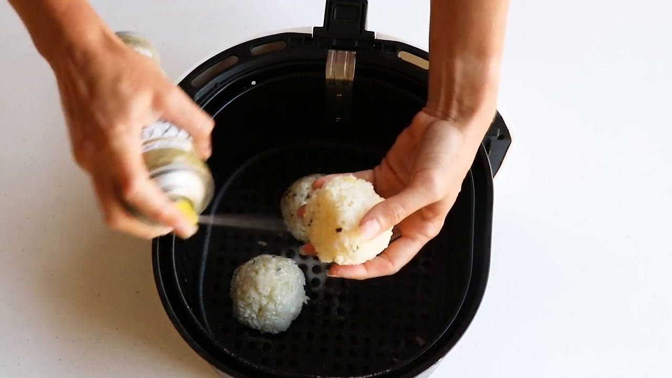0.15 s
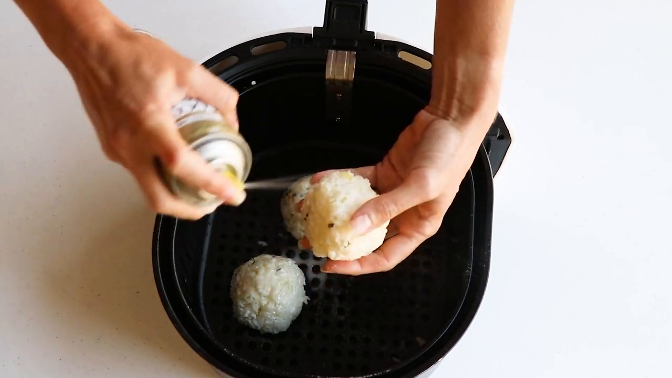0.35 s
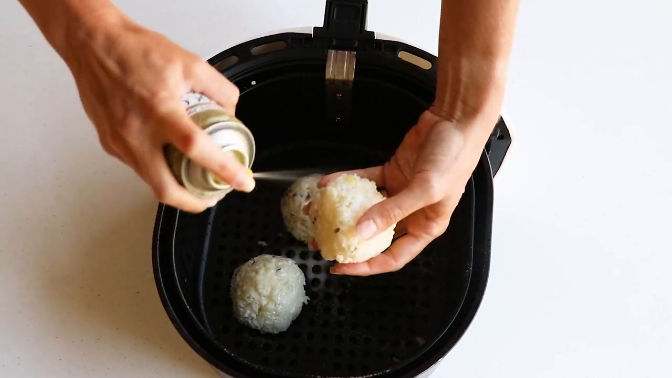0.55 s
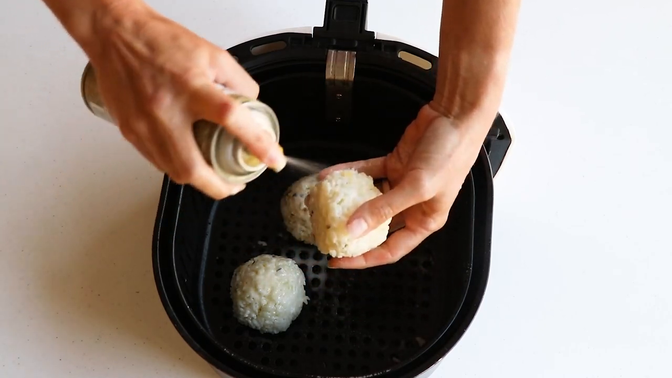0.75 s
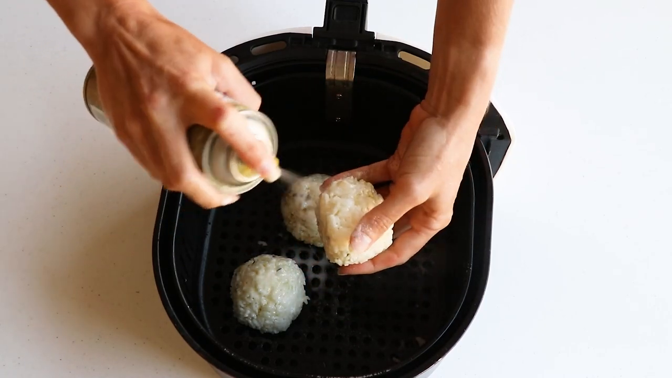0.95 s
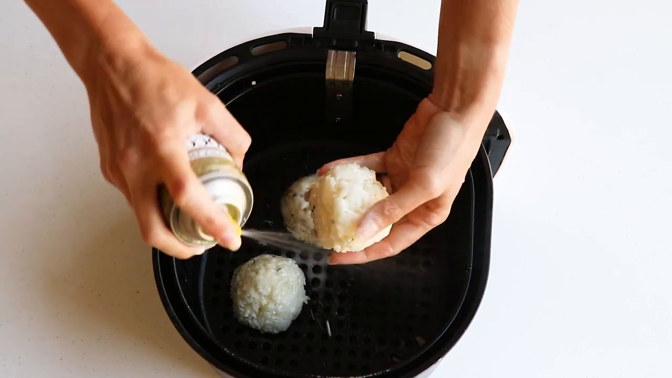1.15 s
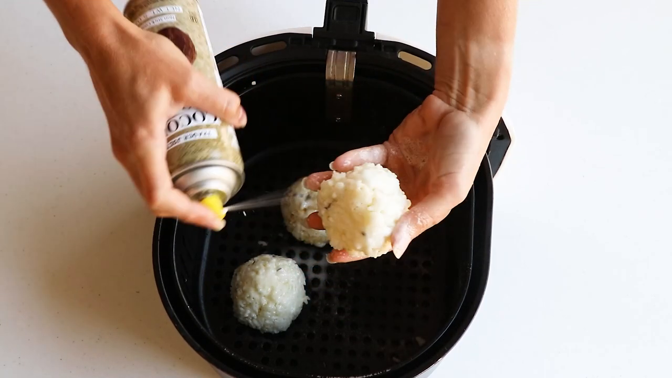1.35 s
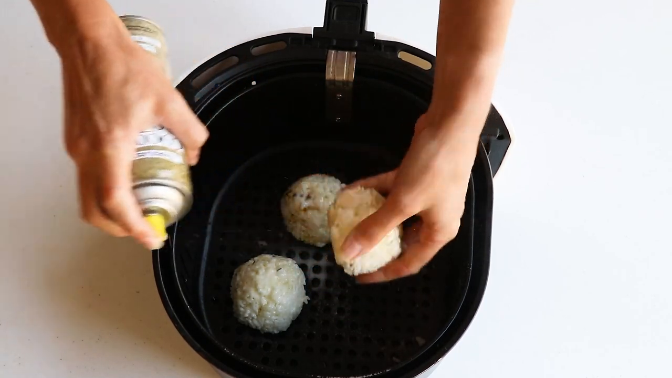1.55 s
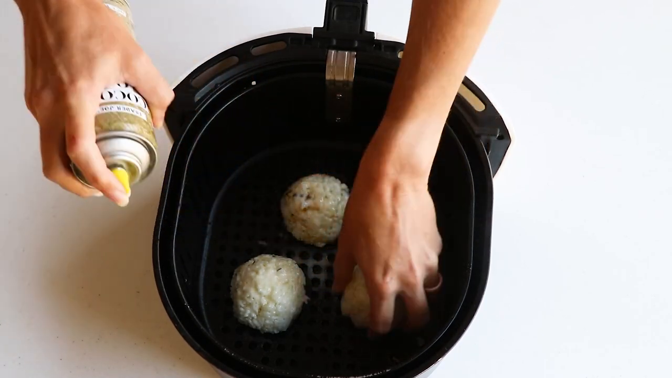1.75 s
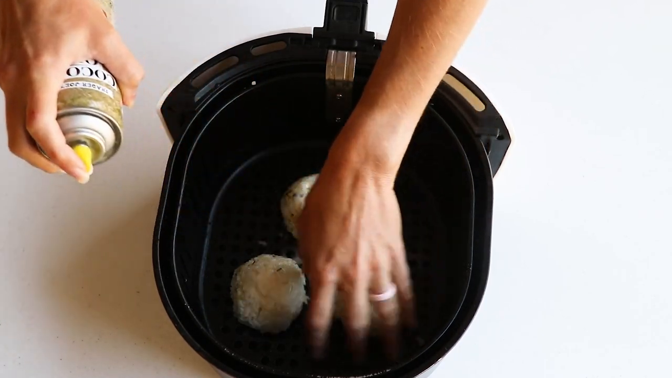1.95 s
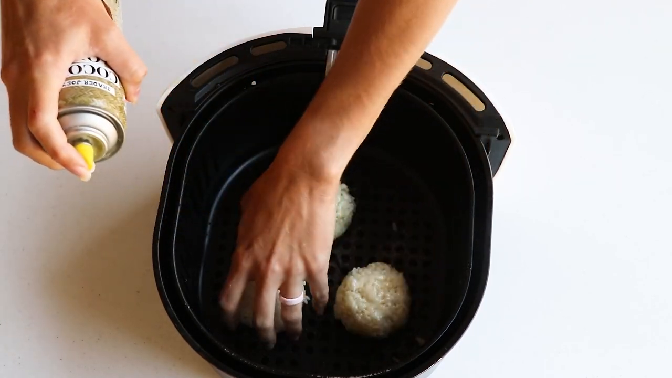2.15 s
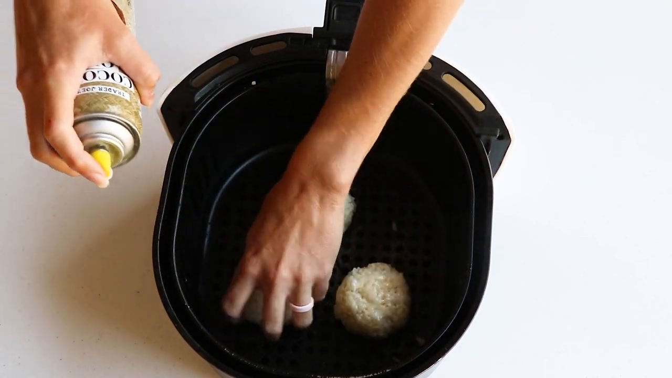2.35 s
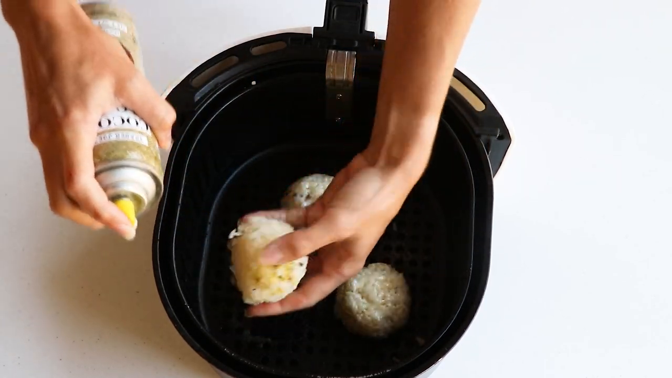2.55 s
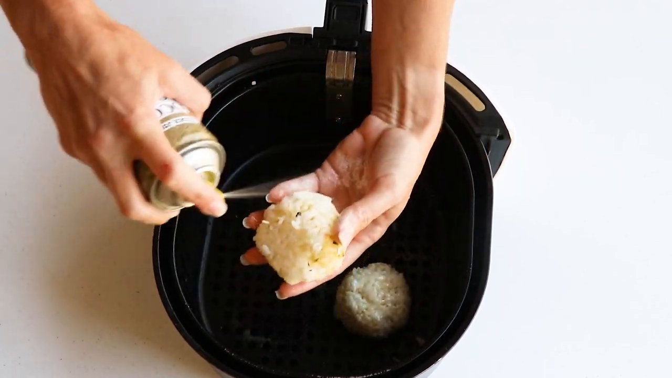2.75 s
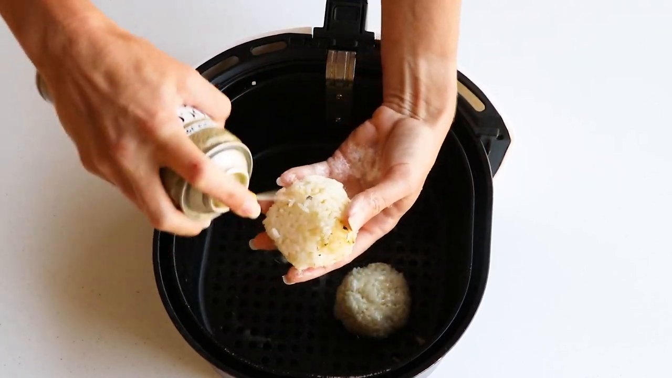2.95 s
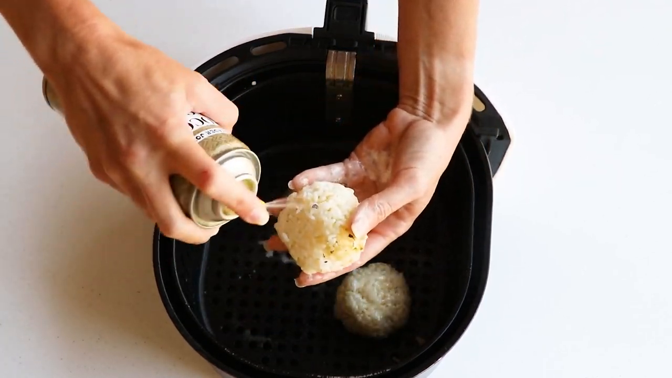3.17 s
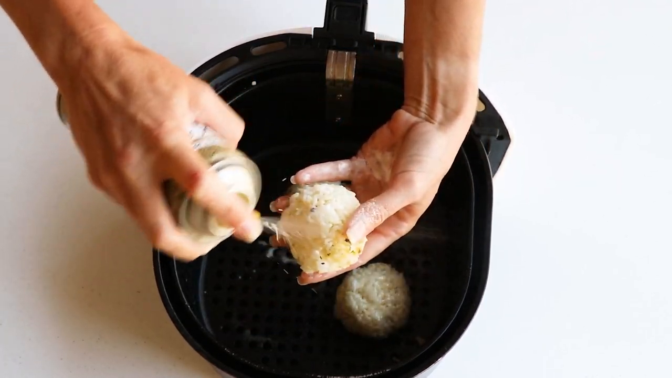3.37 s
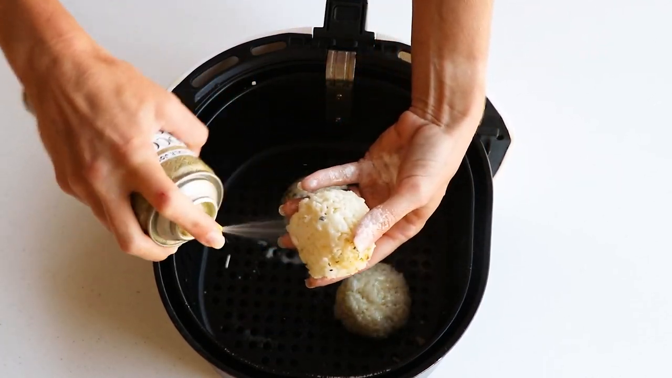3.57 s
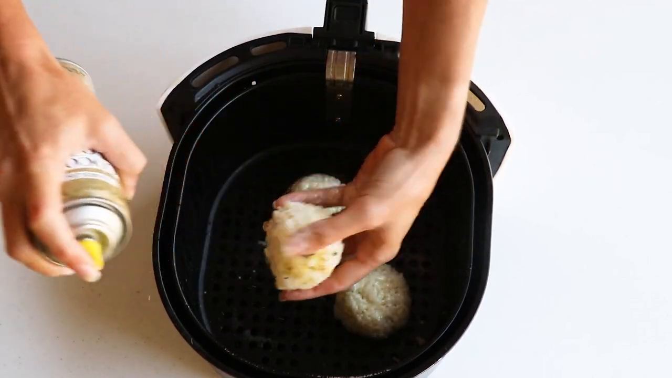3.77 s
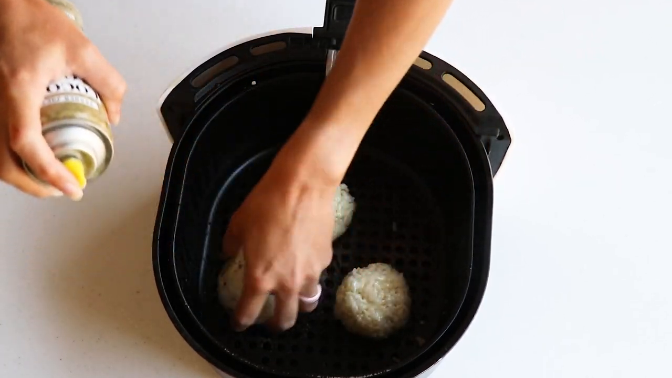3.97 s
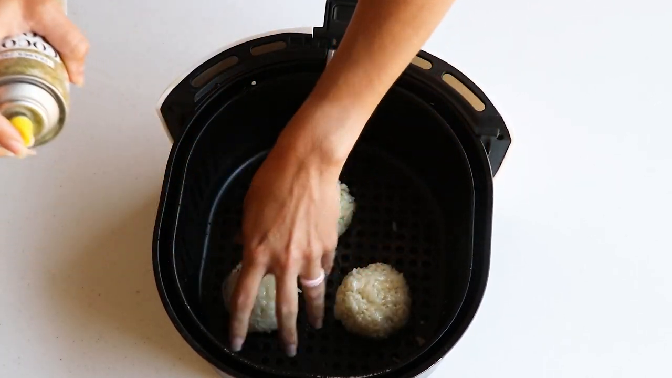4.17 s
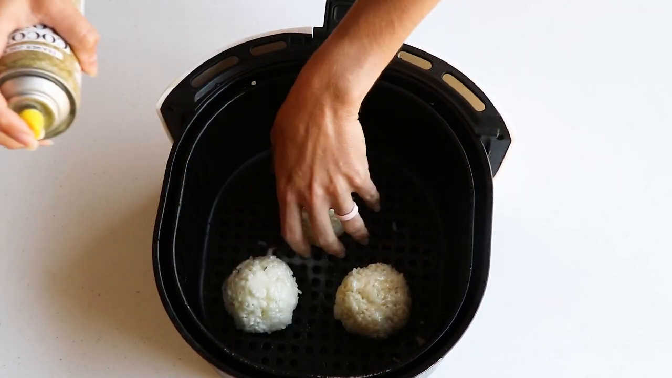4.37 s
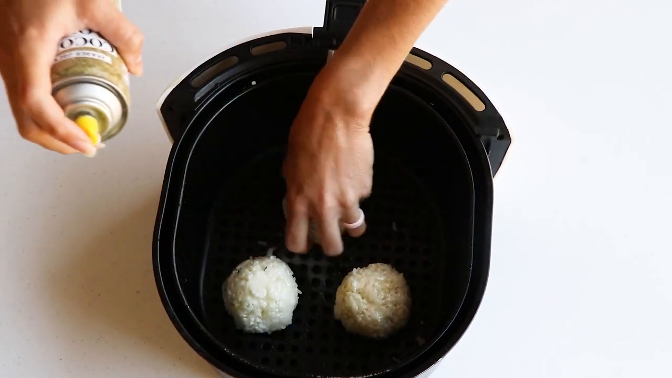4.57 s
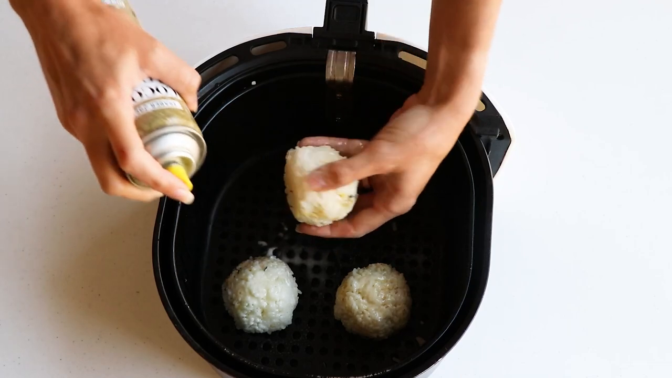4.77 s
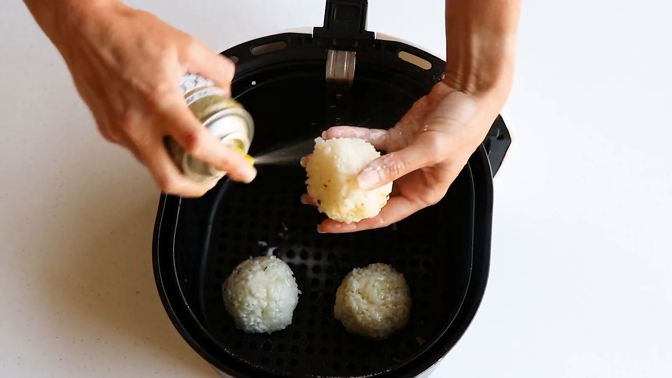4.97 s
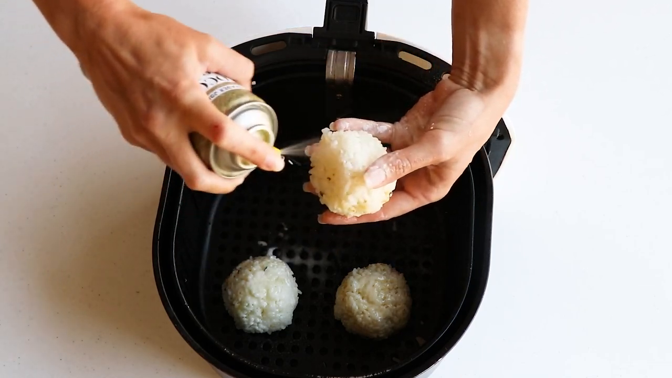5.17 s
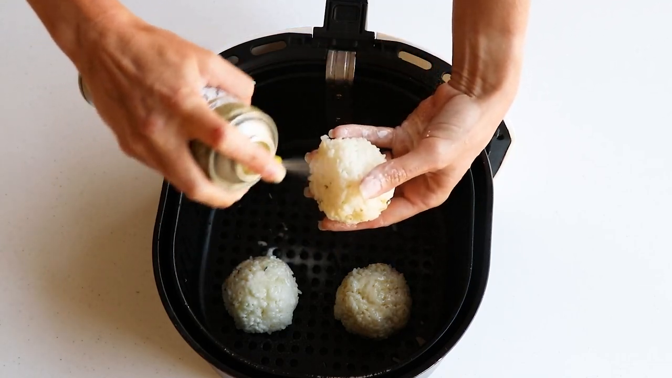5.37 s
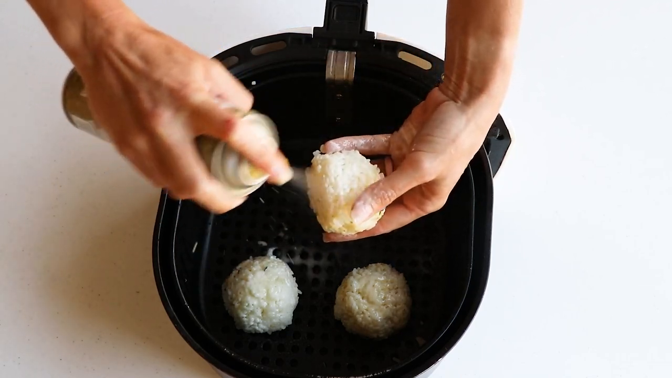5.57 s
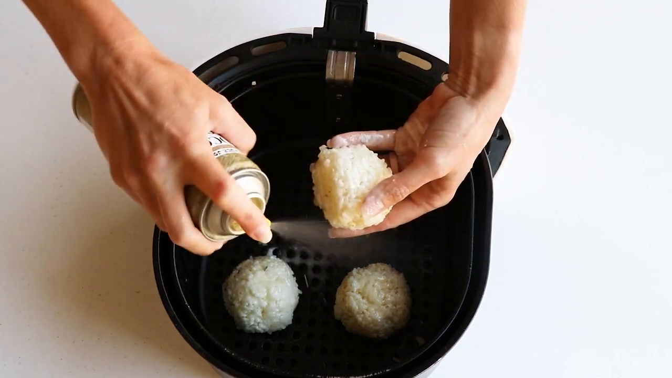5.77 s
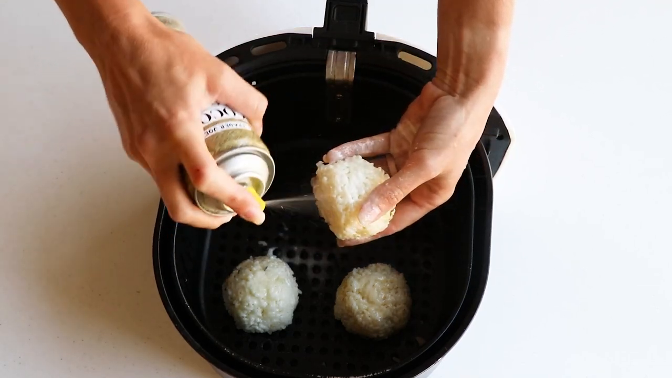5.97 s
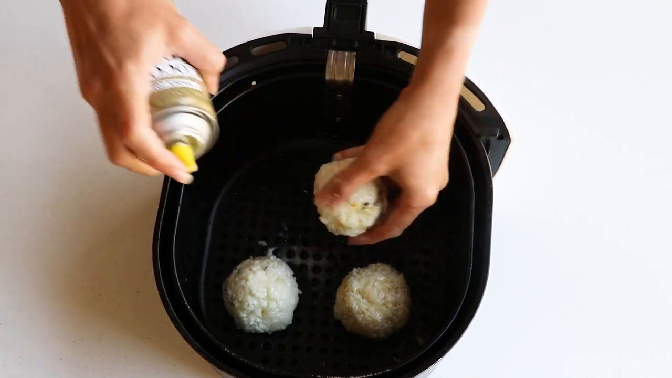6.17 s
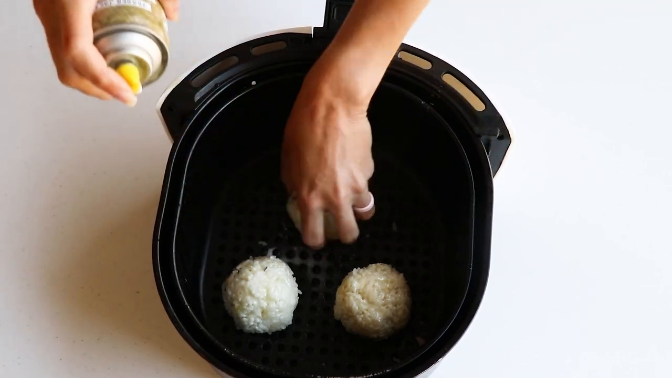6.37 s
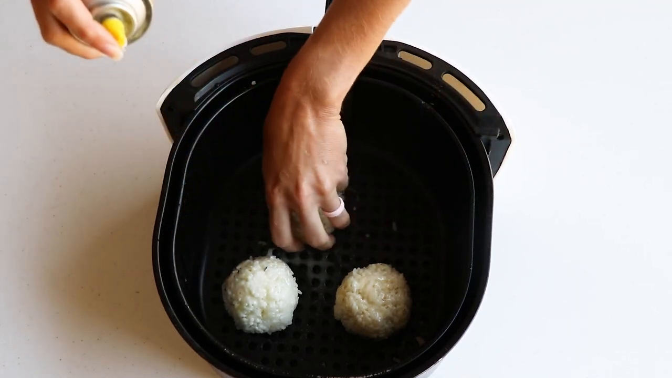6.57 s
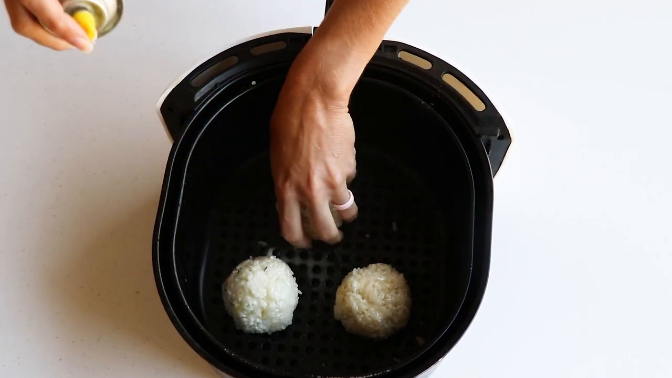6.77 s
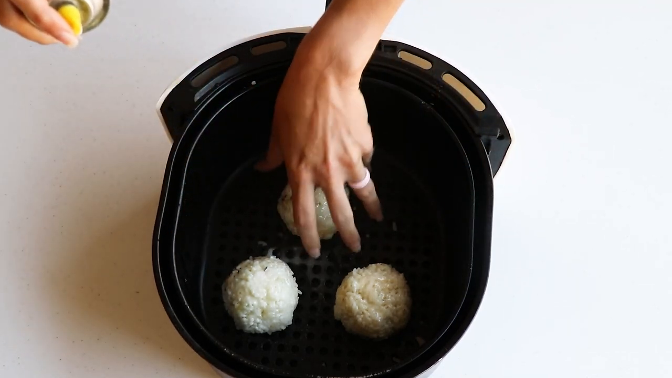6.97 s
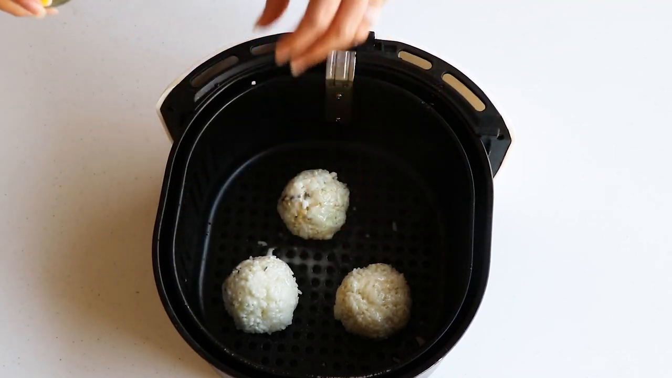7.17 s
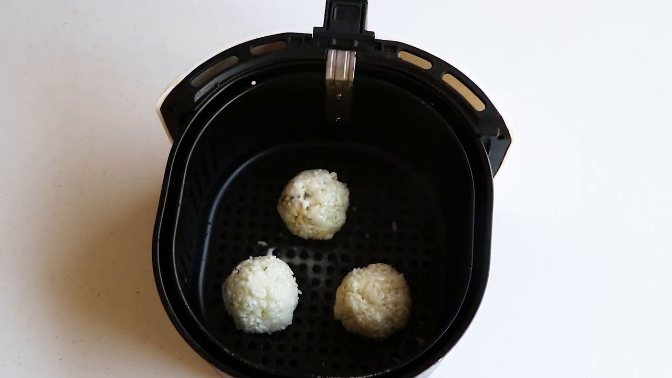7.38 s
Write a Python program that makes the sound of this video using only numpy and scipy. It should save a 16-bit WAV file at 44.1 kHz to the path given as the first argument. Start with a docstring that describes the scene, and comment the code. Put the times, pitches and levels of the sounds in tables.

```python
"""Cooking oil is sprayed from an aerosol can onto three rice balls, one after another, in a small kitchen.
At each press gas noise hisses and rings the nozzle; a lower rush joins as the jet sweeps a ball or finger.
As the valve closes, oil sputters out. Each ball drops onto the loose air-fryer tray: struck modes ring, noise
bursts thud and rattle, the counter rumbles. The tray ticks lightly before a drop or as it rocks back.
After the third drop a faint hiss swells. Throughout, wavering sines hum over steady room noise."""
import sys
import numpy as np
from scipy import signal
from scipy.fft import rfft, irfft, next_fast_len
from scipy.io import wavfile

SR = 44100
rng = np.random.default_rng(int(sys.argv[2]) if len(sys.argv) > 2 else 0)


def wrap_up_sound(samples):
    """Save the sound to the file named by the first command line argument, as 16-bit audio."""
    columns = np.atleast_2d(samples).T
    # keep every value between -1 and 1, then stretch to whole-number steps
    tamed = np.clip(columns, -1, 1)
    steps = np.round(tamed * 32767).astype(np.int16)
    wavfile.write(sys.argv[1], SR, steps)


N = 327663
TIME = np.arange(N) / SR  # [s]
FREQS = np.maximum(np.arange(N // 2 + 1) * SR / N, 1)  # [Hz]

# Every spectrum below gives relative density; noise() scales the result to unit rms.
# Spray levels are set before the gain of the whole spray in scene().

# Presses of the valve, levels before the gain in free_jet():
# (start [s], finger eases off [s], time to close by 20 dB [s], level [dB])
VALVE_PRESSES = [(0.028, 1.58, 0.2, -33), (2.746, 3.726, 0.1264, -33.5), (4.943, 6.159, 0.0739, -33.0)]
CLOSING_CURVE = 1.32  # exponent: the valve closes slowly at first, then faster
# Spectrum of the free jet: (frequency [Hz], density [dB per Hz])
JET_SPECTRUM = [(300, -16.5), (1200, -21), (2000, -11.5), (3400, -9), (4300, -4.5), (5100, -2.5),
                (6400, 0.5), (7500, 3.5), (9300, 3), (10300, -1), (11300, -4), (12600, -1), (14200, 2),
                (16000, 2)]
# Slow wander of the nozzle resonance, one curve per press: (time [s], frequency [Hz])
NOZZLE_PITCH = [
    [(0.05, 8970), (0.914, 8710), (1.55, 8980), (1.58, 8670)],
    [(2.82, 8840), (3.656, 8820), (3.74, 9060)],
    [(5.0, 8780), (5.124, 9040), (5.592, 8600), (6.15, 8910)],
]
# The jet sweeps onto the ball or a finger: (start [s], length [s], initial rush level [dB])
JET_SWEEPS = [(0.031, 0.046, -39), (0.1, 0.026, -34), (0.204, 0.01, -35.5), (0.24, 0.02, -38.5),
              (0.385, 0.0098, -33), (1.001, 0.1, -32), (1.137, 0.075, -32), (1.277, 0.071, -34),
              (1.517, 0.037, -35), (2.744, 0.047, -38.5), (2.869, 0.017, -37), (3.352, 0.079, -33),
              (3.461, 0.056, -31.5), (3.524, 0.1, -32.5), (3.735, 0.04, -39), (4.94, 0.02, -35),
              (4.969, 0.045, -34), (5.029, 0.037, -40.5), (5.086, 0.086, -33), (5.227, 0.073, -34),
              (5.338, 0.037, -35), (5.422, 0.12, -33), (5.574, 0.076, -33), (5.653, 0.067, -30),
              (5.8, 0.113, -32.5), (5.919, 0.028, -30.5), (5.958, 0.22, -38)]
SWEEP_SAG_DB_PER_S = 23.5  # the rush eases as the jet slides on over the round ball
EDGE_DB, EDGE_S = 0.5, 0.037  # leading-edge hiss: level relative to the rush, decay time
# Spectrum of the deflected jet's rush: (frequency [Hz], density [dB per Hz])
RUSH_SPECTRUM = [(150, -23), (400, 0), (700, -5.5), (1000, 1), (1450, -9.5), (2400, -1), (3300, -0.5),
                 (4300, 6.5), (5100, 0), (7200, 3.5), (9000, -40), (11000, -8), (16000, -2.5)]
# Spectrum of the hiss at the leading edge: (frequency [Hz], density [dB per Hz])
EDGE_SPECTRUM = [(3000, -31), (5500, -4), (7400, 4), (9000, 7), (11000, -2), (13000, 7.5), (15000, 7),
                 (16000, -12)]
# Colour of basket and cupped hand on the spray: (frequency [Hz], width [Hz], boost [dB])
HOLLOW_RESONANCES = [(650, 17.6, 14.5), (1523, 80, 8), (1962, 305, 4.5), (2850, 160, 6.5), (3194, 250, 3.5),
                     (4300, 600, 4.5), (5455, 620, 2.5), (7410, 160, 1.5)]
# Main resonance of the gap between nozzle, ball and palm; share by which it wanders
CUP_HZ, CUP_WANDER = 1456, 0.1
# Spectrum of the last oil leaving the nozzle: (frequency [Hz], density [dB per Hz])
SPUTTER_SPECTRUM = [(200, -15), (700, -6), (2000, -1), (4500, 1.5), (8000, -1), (11000, -15), (16000, -20)]
SPUTTER_DB, SPUTTER_S = -43, 0.1  # initial level and decay time

# A ball lands on the tray, levels before the gains in tray(): (time [s], rattle [dB],
# loss per chatter [dB], thud [dB], delay of the thud [s], rattle of the tray rocking back [dB],
# delay of the rocking back [s], spot [0-2])
BALL_LANDINGS = [(2.304, -32.5, 0.7, -35, 0.013, -46.5, 0.11, 0),
                 (4.514, -28, 8, -34, 0.007, -35.5, 0.064, 1), (6.459, -34, 7, -37.5, 0.031, -56, 0.046, 2)]
# Light ticks of the tray, before a drop or as it rocks back: (time [s], rattle [dB], spot [0-2])
TRAY_TICKS = [(1.901, -43.5, 0), (1.968, -51, 0), (4.08, -54.5, 1), (4.131, -42, 1), (4.663, -46.5, 1),
              (6.386, -53, 2)]
# Modes of tray and basket: (frequency [Hz], t60 [s], relative level when struck at spot 0 [dB],
# at spot 1 [dB], at spot 2 [dB])
TRAY_MODES = [(202, 0.15, -4, 3.5, 3), (304, 0.15, -5, 0, -10), (336, 0.13, -3, 2, -5),
              (473, 0.18, -10, 1.5, 3), (529, .18, -10, -5, 6.5), (669, 0.12, -4, 1, -13),
              (819, 0.33, 1.5, 0, -13), (1162, .14, -12, -23, -3), (1295, 0.27, -16, -5, -13),
              (1453, 0.41, -6.5, -4, -11), (2050, 0.29, -5, -8.5, -15.5), (2550, 0.18, 2, -7, -20),
              (2624, 0.13, 1.5, 4, -3), (3200, 0.16, -1, -6, -18), (3760, 0.22, -11, -1.5, -21),
              (4280, 0.2, -11, -4, -21), (4730, 0.07, -12, 5, -17)]
# Spectrum of the soft rice flattening: (frequency [Hz], density [dB per Hz])
SQUASH_SPECTRUM = [(60, -34), (180, -6), (300, -2.5), (500, 9), (800, -5.5), (1300, -5), (3000, -53)]
# Spectrum of the tray's rattle: (frequency [Hz], density [dB per Hz])
RATTLE_SPECTRUM = [(100, -8.5), (300, 2), (700, -1), (1100, 0), (1800, -2.5), (2700, -1), (4000, 0.5),
                   (5400, 0.5), (6800, -5.5), (8800, -5.5), (10500, -18.5), (16000, -22)]
TOUCH_THUD_DB, TICK_THUD_DB = -15, -9  # thud of a light contact and of a tick, relative to its rattle
SOFT_RATTLE_DB = -16  # rattle under the soft thud, relative to the thud
CHATTER_GAP_S, ROCK_LOSS_DB = 0.0093, 3.5  # gap between chatters; loss per chatter on rocking back
SETTLE_S, SETTLE_DB = 0.018, -6  # the ball slumps once more after its thud
UNEVEN_S = 0.0012  # spread in the timing of the chatter and the slump
# The counter shakes after each landing or tick, following a share of its rattle dB
SHAKE_DB, SHAKE_FOLLOWS, SHAKE_LAG_S, SHAKE_S = -39.5, 0.46, 0.0097, 0.22
# Spectrum of the counter's rumble: (frequency [Hz], density [dB per Hz])
RUMBLE_SPECTRUM = [(8, -12), (18, -3), (32, 0), (50, -15), (120, -19), (400, -58)]

# Spectrum of the faint hiss at the end: (frequency [Hz], density [dB per Hz])
LATE_HISS_SPECTRUM = [(800, -18), (1400, -2), (2000, -1), (3000, -4.5), (4500, -14), (7000, -5),
                      (10000, -18), (16000, -7)]
# Reverberation of the kitchen: (frequency [Hz], t60 [s])
KITCHEN_T60 = [(150, 1), (1000, 0.75), (2800, 0.49), (7300, 0.31), (15000, 0.27)]
# Spectrum of the steady room noise: (frequency [Hz], density [dB per Hz])
ROOM_NOISE_SPECTRUM = [(20, -16), (45, -12), (65, -9), (105, -6), (150, -10.5), (230, 0), (320, -4),
                       (420, -3), (700, -9.5), (1450, -17), (1850, -18), (2560, -24.5), (5000, -25),
                       (15500, -29.5)]
ROOM_NOISE_DB = -50.66
# Lines of the appliance hum: (frequency [Hz], rms level around which it wavers [dB])
HUM_LINES = [(58.5, -64), (178, -66), (296, -64), (355.5, -61), (715, -64.5)]
# Spectrum of the faint noise that differs between channels: (frequency [Hz], density [dB per Hz])
CHANNEL_NOISE_SPECTRUM = [(20, 3), (150, -7.5), (400, -10), (1500, -15.5), (5000, -13.5), (16000, -8)]
CUTOFF_HZ = 15850


def from_db(db):
    """Decibels to gain."""
    return 10 ** (np.asarray(db) / 20)


def rms_one(x):
    """Scale to unit rms."""
    return x / np.sqrt(np.mean(x ** 2) + 1e-20)


def at_hz(points, hz):
    """Read a table on a log-frequency axis."""
    known_hz, values = np.transpose(points)
    return np.interp(np.log(hz), np.log(known_hz), values)


def noise(spectrum, resonances=()):
    """Unit noise with a broad spectrum and resonant bumps on it."""
    db = at_hz(spectrum, FREQS)
    for hz, width, boost_db in resonances:
        db = db + boost_db / (1 + (2 * (FREQS - hz) / width) ** 2)
    size = next_fast_len(N, True)
    bin_hz = np.arange(size // 2 + 1) * SR / size
    gain = np.interp(bin_hz, FREQS, from_db(db))
    white = rfft(rng.standard_normal(size))
    return rms_one(irfft(white * gain, size)[:N])


def drift(rate):
    """Smooth random wander of spread 1 that changes about rate times a second."""
    step = 40  # drawn at a low rate, then interpolated
    r = np.exp(-2 * np.pi * rate * step / SR)
    draws = rng.standard_normal(N // step + 2002)
    slow = signal.lfilter([1], [1, -2 * r, r * r], draws)[2000:]  # drop the filter's start-up
    return np.interp(np.arange(N) / step, np.arange(len(slow)), rms_one(slow))


def die_away(x, seconds):
    """One-pole smoothing with the given time constant."""
    r = np.exp(-1 / (seconds * SR))
    return signal.lfilter([1 - r], [1, -r], x + 1e-18)


def ring(clicks, hz, t60):
    """A unit click sets a decaying sine of height 1 ringing."""
    r = 10 ** (-3 / (t60 * SR))
    w = 2 * np.pi * hz / SR
    return signal.lfilter([0, np.sin(w)], [1, -2 * r * np.cos(w), r * r], clicks + 1e-18)


def moving_resonance(centre_hz, width_hz):
    """Turbulence ringing in a resonance whose centre moves."""
    lowpass = signal.butter(2, width_hz / 2, fs=SR, output="sos")
    band = signal.sosfilt(lowpass, rng.standard_normal((2, N)))
    phase = 2 * np.pi * np.cumsum(centre_hz) / SR
    return rms_one(band[0] * np.cos(phase) + band[1] * np.sin(phase))


def bursts(at, db, decay_s):
    """Envelope of blows that start at once and die away; their energies add."""
    energy = np.zeros(N)
    np.add.at(energy, at, from_db(db) ** 2)
    energy_decay_s = decay_s / 2  # energy falls twice as fast as amplitude
    return np.sqrt(die_away(energy, energy_decay_s) * energy_decay_s * SR)


def valve():
    """Gas flow: it starts at once, holds while the finger presses and fades as the valve closes."""
    flow = np.zeros(N)
    for start, release, closing_s, db in VALVE_PRESSES:
        closing = np.maximum(TIME - release, 0) / closing_s
        flow += (TIME >= start) * from_db(db - 20 * closing ** CLOSING_CURVE)
    return flow


def free_jet(level_db=1.8, nozzle_db=-7.0, width_hz=700, wander_hz=230, flutter_db=0.6, opening_s=0.0049):
    """The valve snaps open and closes slowly; the gas hisses and rings the nozzle."""
    nozzle_hz = np.interp(TIME, *np.vstack(NOZZLE_PITCH).T) + wander_hz * drift(12)
    nozzle = moving_resonance(nozzle_hz, width_hz)
    hiss = rms_one(noise(JET_SPECTRUM, HOLLOW_RESONANCES) + from_db(nozzle_db) * nozzle)
    # oil in the gas makes the flow uneven
    flutter = from_db(level_db + flutter_db * drift(27))
    return die_away(valve(), opening_s) * flutter * hiss


def cupped_hand(swell_db=3, wander=0.04):
    """The hollows around the ball swell and shift in pitch irregularly, each on its own."""
    hollows = np.zeros(N)
    for hz, width, db in HOLLOW_RESONANCES:
        swell = from_db(db + swell_db * np.tanh(drift(17)))
        tone = moving_resonance(hz * (1 + wander * drift(5)), width)
        hollows += swell * np.sqrt(width) * tone
    return rms_one(hollows)


def deflected_jet(rise_s=0.0049, flutter_db=1.56, spit_db=-0.1, hollow_db=-4, cup_db=-15, cup_width_hz=420):
    """An obstacle in the jet adds a lower rush and, at its leading edge, more hiss."""
    rush, edge = np.zeros((2, N))
    for start, length, db in JET_SWEEPS:
        span = slice(int(start * SR), int((start + length) * SR))
        age = TIME[span] - start
        rush[span] = from_db(db - SWEEP_SAG_DB_PER_S * age)
        edge[span] = from_db(db + EDGE_DB) * np.exp(-age / EDGE_S)
    cup = moving_resonance(CUP_HZ * (1 + CUP_WANDER * drift(3)), cup_width_hz)
    turbulence = noise(RUSH_SPECTRUM) + from_db(hollow_db) * cupped_hand() + from_db(cup_db) * cup
    # droplets spatter on the rice and roughen the rush
    turbulence = rms_one(turbulence * from_db(spit_db * drift(290)))
    sound = die_away(rush, rise_s) * turbulence
    sound += die_away(edge, rise_s) * noise(EDGE_SPECTRUM)
    return sound * from_db(flutter_db * drift(37))


def sputter(rough_db=4.0):
    """The last oil leaves the nozzle as a weak, uneven rush."""
    release = (np.array(VALVE_PRESSES)[:, 1] * SR).astype(int)
    roughness = from_db(rough_db * drift(56))
    return bursts(release, SPUTTER_DB, SPUTTER_S) * noise(SPUTTER_SPECTRUM) * roughness


def near_echoes(x):
    """Hand, basket wall and counter reflect the spray over paths whose lengths sway slightly."""
    gain, sway_s = from_db(-10.5), 0.00009
    delays_s = (0.0008, 0.0014, 0.0023, 0.0037)
    echoes = sum(np.interp(TIME - delay_s - sway_s * drift(1.88), TIME, x, left=0) for delay_s in delays_s)
    return (x + gain * echoes) / np.sqrt(1 + len(delays_s) * gain ** 2)


def contacts():
    """A landing chatters, thuds, slumps and rocks back; a tick is single: (s, thud dB, rattle dB, spot)."""
    rows = [(s, rattle + TICK_THUD_DB, rattle, spot) for s, rattle, spot in TRAY_TICKS]
    for s, rattle, loss, thud, thud_s, rock, rock_s, spot in BALL_LANDINGS:
        # the loose tray chatters three times after the blow, and again as it rocks back
        for k in range(3):
            for start, db in ((s, rattle - k * loss), (s + rock_s, rock - k * ROCK_LOSS_DB)):
                chatter_s = start + k * (CHATTER_GAP_S + UNEVEN_S * rng.standard_normal())
                rows.append((chatter_s, db + TOUCH_THUD_DB, db, spot))
        # soft thud, then the slump
        for k in range(2):
            db = thud + k * SETTLE_DB
            slump_s = s + thud_s + k * (SETTLE_S + UNEVEN_S * rng.standard_normal())
            rows.append((slump_s, db, db + SOFT_RATTLE_DB, spot))
    return rows


def tray(ring_db=-6, rattle_s=0.014, squash_db=-2, squash_s=0.014, spread_db=0.3):
    """A soft ball flattens with a thud and rings the tray's modes while the loose tray chatters in the basket."""
    s, thud, rattle, spot = np.transpose(contacts())
    at = (s * SR).astype(int)
    spot = np.clip(np.round(spot), 0, 2).astype(int)
    spread = spread_db * rng.standard_normal((len(s), len(TRAY_MODES)))
    strengths = from_db(thud[:, None] + spread)
    out = np.zeros(N)
    for k, (hz, t60, *spot_db) in enumerate(TRAY_MODES):
        mode_gain = from_db(np.array(spot_db)[spot] + ring_db) * (-1) ** k  # alternate polarity
        clicks = np.zeros(N)
        np.add.at(clicks, at, strengths[:, k] * mode_gain)
        out += ring(clicks, hz, t60)
    out += bursts(at, thud + squash_db, squash_s) * noise(SQUASH_SPECTRUM)
    return out + bursts(at, rattle, rattle_s) * noise(RATTLE_SPECTRUM)


def counter(settle_s=0.023):
    """Each landing and tick pushes on the basket and shakes the counter into a deep rumble."""
    push = np.zeros(N)
    for s, db, *_ in BALL_LANDINGS + TRAY_TICKS:
        start = s + SHAKE_LAG_S
        shaking = (TIME > start) * (TIME < start + SHAKE_S)
        push += from_db(SHAKE_DB + SHAKE_FOLLOWS * db) ** 2 * shaking  # energies add
    return die_away(np.sqrt(push), settle_s) * noise(RUMBLE_SPECTRUM)


def late_hiss(start_s=6.94, rise_s=0.044, level_db=-59):
    """A faint hiss swells and stays."""
    return from_db(level_db) * die_away(TIME > start_s, rise_s) * noise(LATE_HISS_SPECTRUM)


def kitchen(x, build_s=0.013):
    """Diffuse reflections build up and die away, each frequency band at its own rate."""
    t = TIME[:SR]
    edges = np.geomspace(100, 17000, 9)
    tail = 0
    for low, high in zip(edges, edges[1:]):
        bandpass = signal.butter(2, [low, high], "band", fs=SR, output="sos")
        band = signal.sosfilt(bandpass, rng.standard_normal(SR))
        t60 = at_hz(KITCHEN_T60, np.sqrt(low * high))
        tail = tail + band * 10 ** (-3 * t / t60)
    tail = tail * (1 - np.exp(-t / build_s))
    return signal.fftconvolve(x, tail / np.sqrt(np.sum(tail ** 2)))[:N]


def background(waver_db=1.5):
    """Steady room noise and the hum of an appliance, its lines wavering in level and phase."""
    hum = np.zeros(N)
    for hz, db in HUM_LINES:
        level = np.sqrt(2) * from_db(db + waver_db * drift(1.9))
        hum += level * np.sin(2 * np.pi * hz * TIME + 0.5 * drift(1.75))
    return from_db(ROOM_NOISE_DB) * noise(ROOM_NOISE_SPECTRUM) + hum


def scene(spray_db=1.56, spray_room_db=-13, tray_room_db=-7, side_db=-39, channel_noise_db=-60):
    """Everything sits in the middle; faint differences between the two channels give slight width."""
    spray = from_db(spray_db) * near_echoes(free_jet() + deflected_jet() + sputter())
    drops = tray()
    room = kitchen(from_db(spray_room_db) * spray + from_db(tray_room_db) * drops)
    mid = spray + drops + room + counter() + background() + late_hiss()
    side = from_db(side_db) * kitchen(mid)
    channel_noise = np.array([noise(CHANNEL_NOISE_SPECTRUM), noise(CHANNEL_NOISE_SPECTRUM)])
    return np.array([mid + side, mid - side]) + from_db(channel_noise_db) * channel_noise


def record(dry):
    """The top is cut steeply."""
    lowpass = signal.ellip(14, 0.1, 90, CUTOFF_HZ, fs=SR, output="sos")
    return signal.sosfilt(lowpass, dry)


dry = scene()
out = record(dry)
wrap_up_sound(out)
```